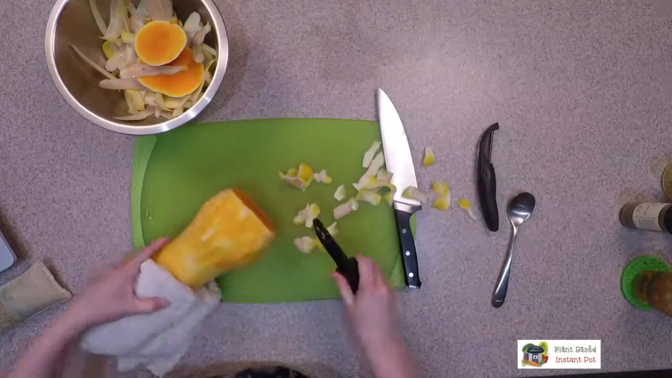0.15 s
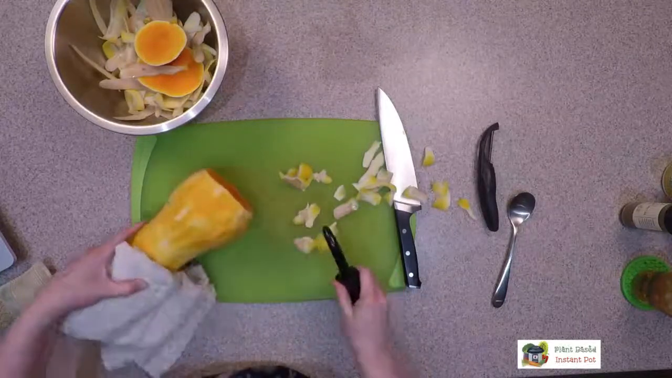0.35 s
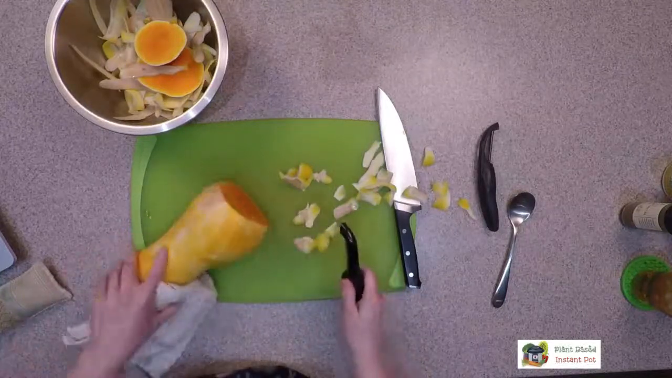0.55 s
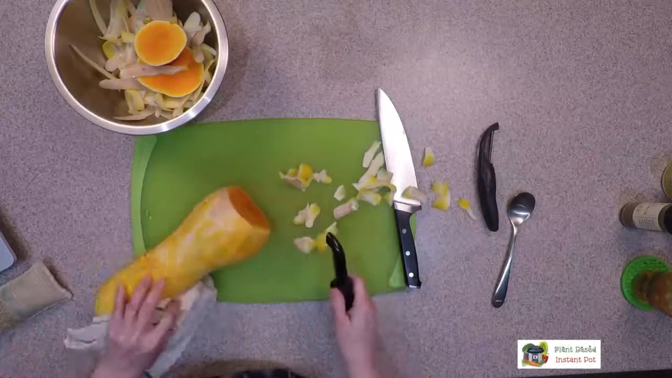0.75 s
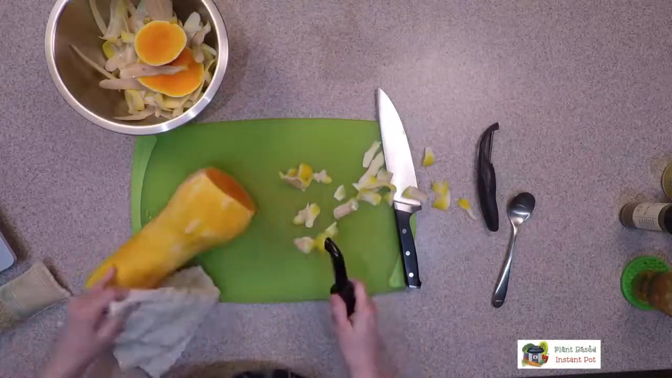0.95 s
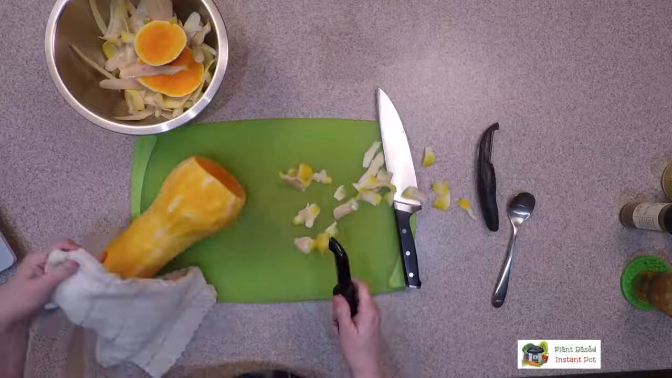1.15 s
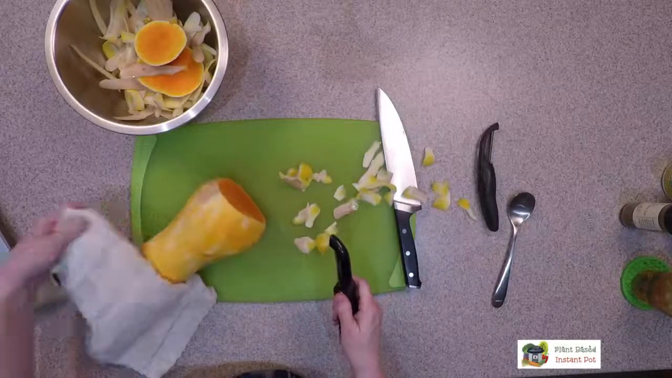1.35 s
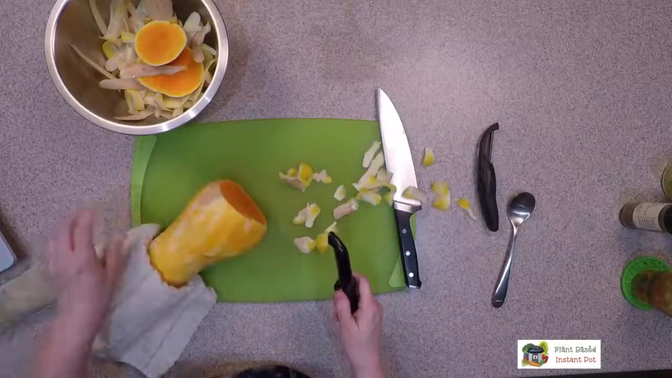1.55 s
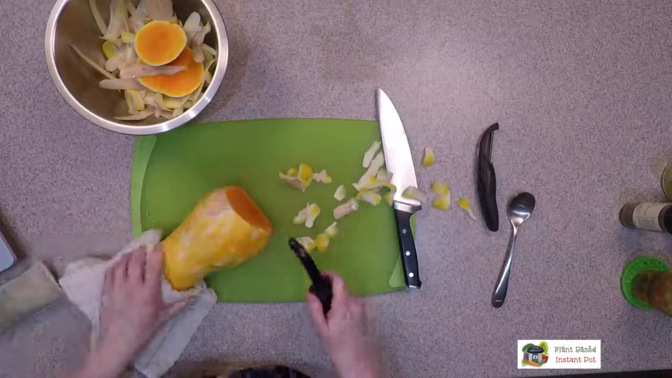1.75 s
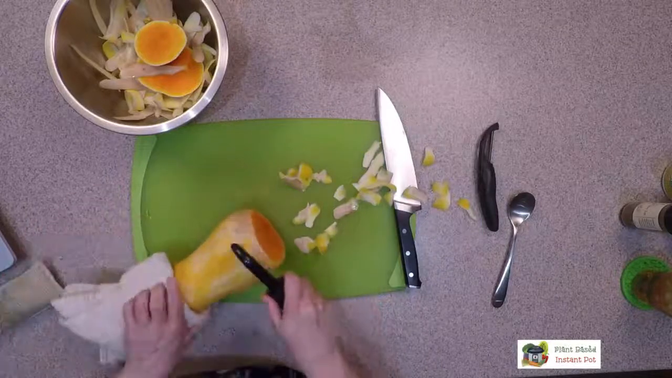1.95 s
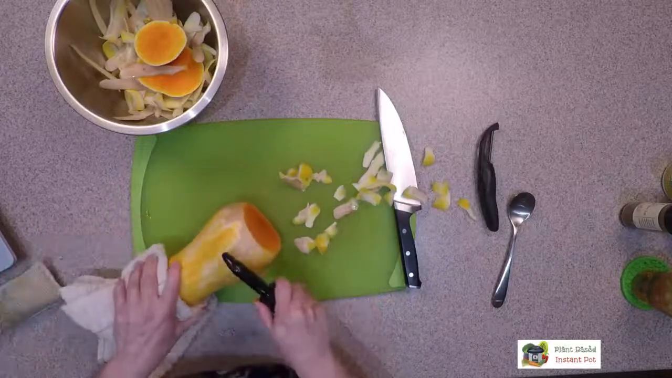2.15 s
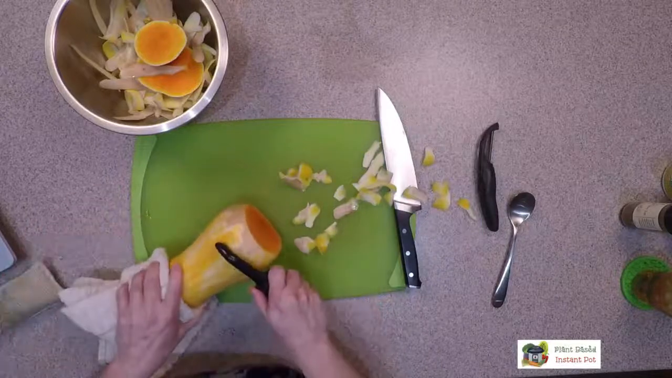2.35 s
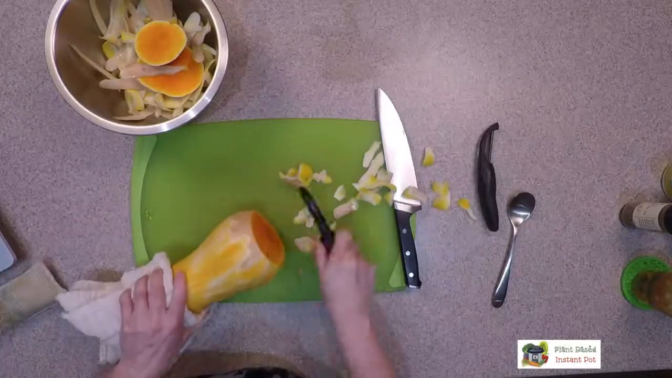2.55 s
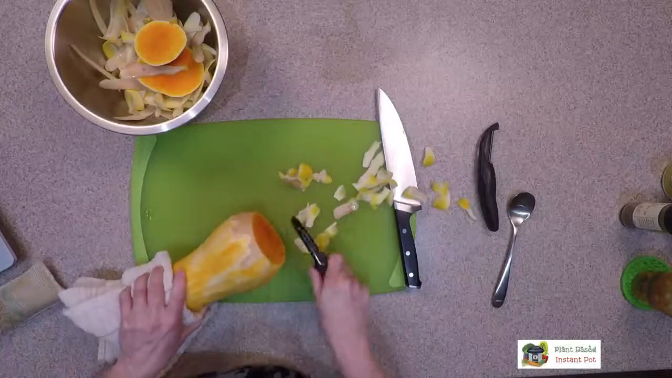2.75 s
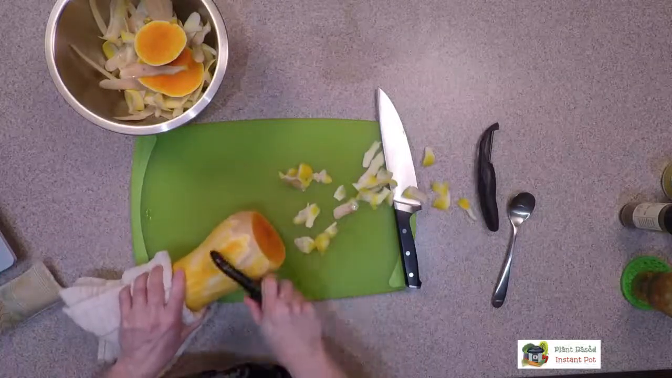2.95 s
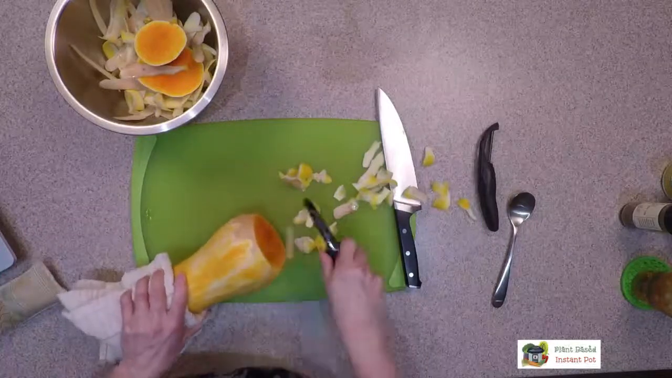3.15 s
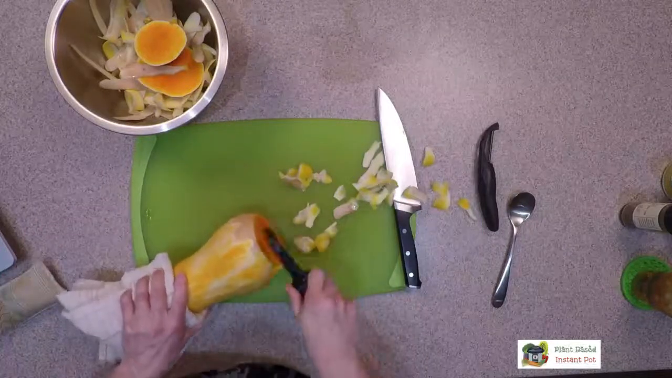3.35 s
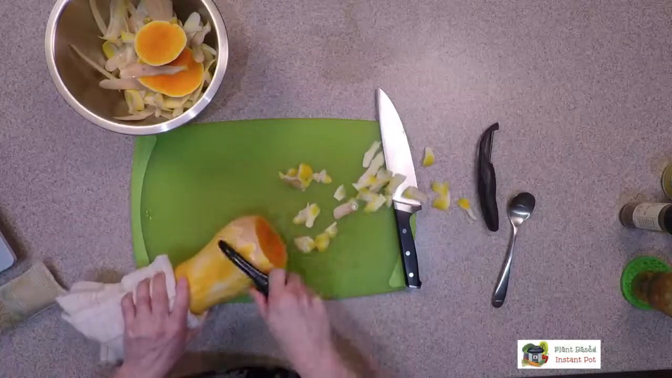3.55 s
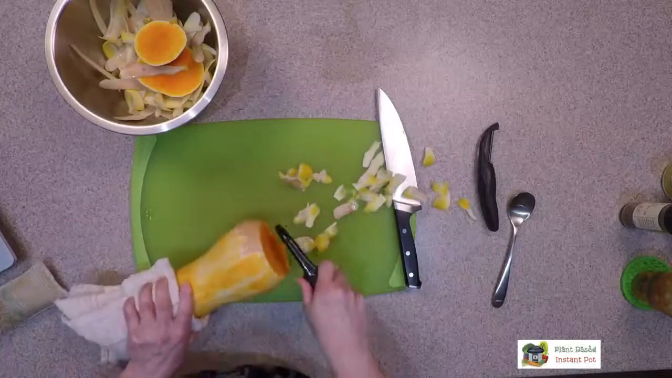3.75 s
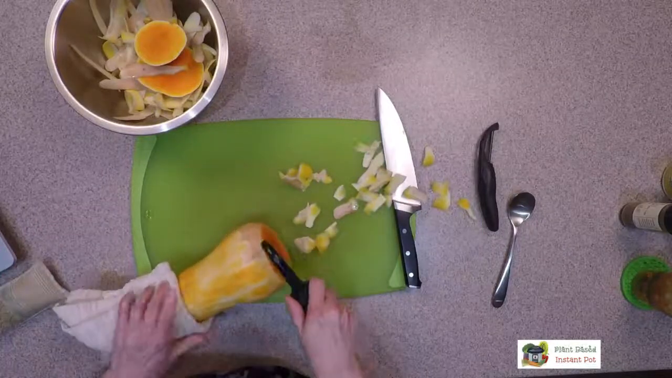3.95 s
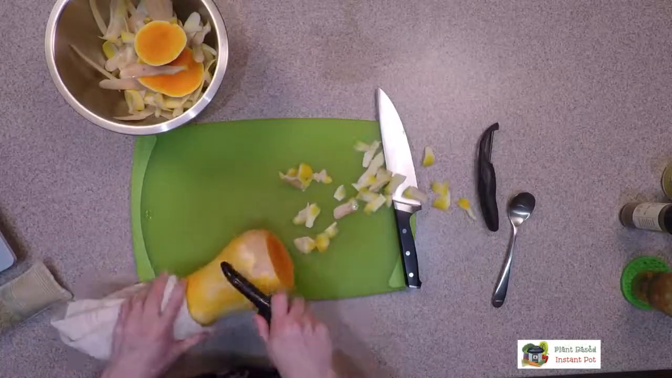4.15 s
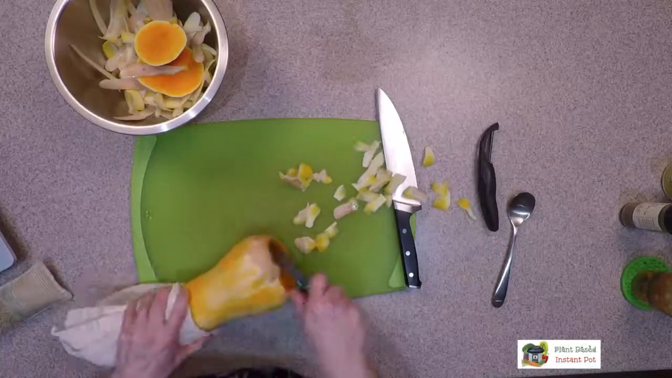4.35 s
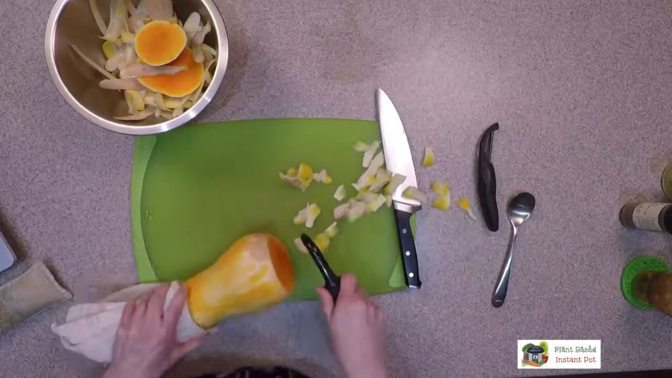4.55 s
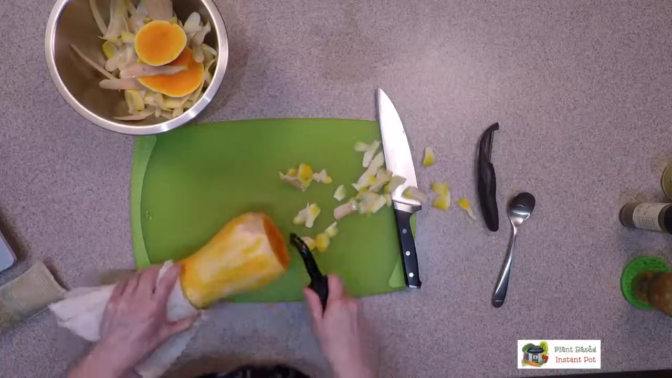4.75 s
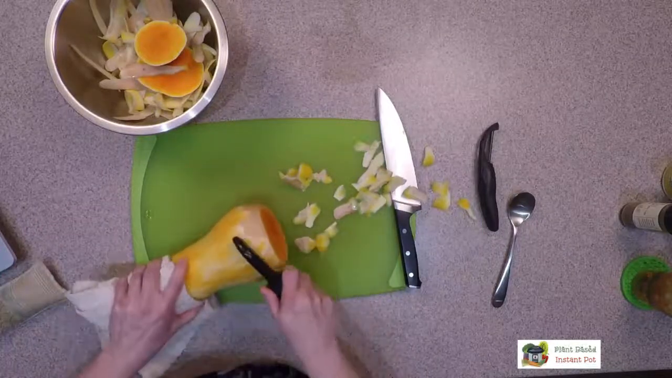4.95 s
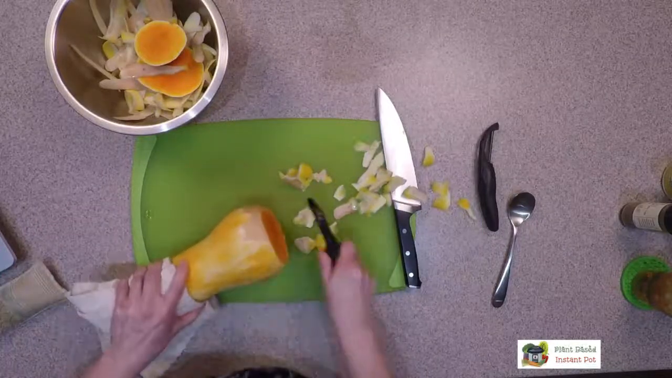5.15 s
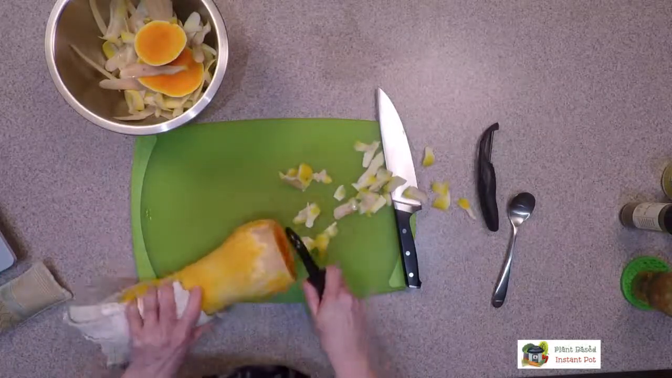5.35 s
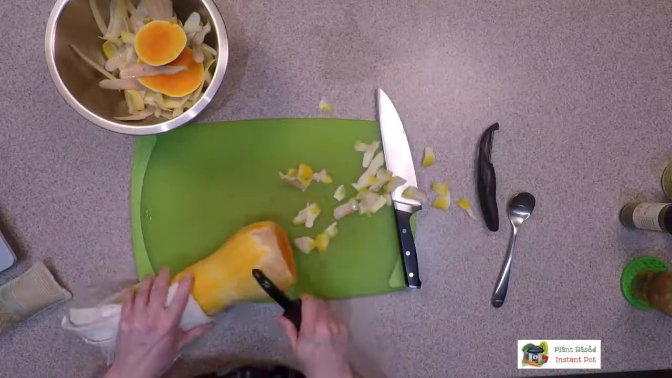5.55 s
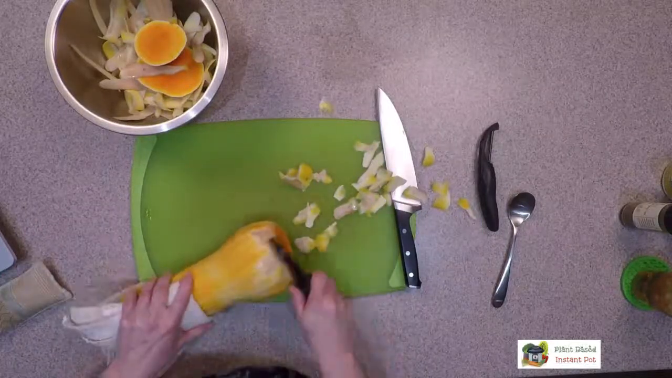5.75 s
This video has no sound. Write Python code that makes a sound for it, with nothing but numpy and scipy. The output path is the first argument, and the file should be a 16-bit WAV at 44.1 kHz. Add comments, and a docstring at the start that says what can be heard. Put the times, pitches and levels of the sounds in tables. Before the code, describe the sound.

A peeler takes short crisp scrapes off a firm squash, with light blade ticks, low board thuds and two heavy drops in a quiet kitchen.

```python
"""A kitchen hums quietly while a peeler taps and brushes a firm squash: bursts of noise ring in the blade.
The squash rocks on a thin plastic board, with low thuds in the counter; a cloth rustles against it.
Twice it drops onto the board with a hard, low swing. From 2.4 s the blade lands, drags through the skin
and slips off, seven times: tiny random snaps excite the peeler and the squash, and hollow knocks join in.
The recorder squeezes the loudest thuds and cuts off the high treble."""
import sys
import numpy as np
from scipy import signal
from scipy.fft import rfft, irfft, next_fast_len
from scipy.io import wavfile
from scipy.ndimage import uniform_filter1d, map_coordinates

SR = 44100
rng = np.random.default_rng(int(sys.argv[2]) if len(sys.argv) > 2 else 0)


def to_wav(s):
    """Save 16-bit WAV."""
    ch = np.atleast_2d(s).T  # columns
    pcm = np.round(np.clip(ch, -1, 1) * 32767)  # PCM
    wavfile.write(sys.argv[1], SR, pcm.astype(np.int16))


N = 260190  # samples in the scene
STEP = 16  # samples from one control value to the next

# How the thin board rings: pitch_hz, width_hz, level_db
BOARD_MODES = [(124, 41, -4), (185.6, 39.8, 3), (250, 85, -6), (354, 56, -8), (490, 45, -11.5),
               (574, 67, -10.5), (727, 110, -13), (900, 120, -19), (1204, 300, -25)]
# How the blade rings: pitch_hz, width_hz, level_db
BLADE_MODES = [(4100, 119, -7.5), (4794, 540, -3.5), (5210, 640, -2.5), (5810, 610, -2.5), (6155, 420, 0),
               (6380, 830, -8.5)]
# How the peeler's frame rings: pitch_hz, width_hz, level_db
FRAME_MODES = [(1880, 600, -14.5), (2300, 190, -7.5), (3020, 410, -8.5), (3270, 150, -4.5), (3830, 540, -7)]


def amp(db):
    """Turn decibels into a gain."""
    return 10 ** (np.asarray(db) / 20)


def unit(x):
    """Scale to an rms of 1."""
    return x / np.sqrt(np.mean(x ** 2) + 1e-20)


def along(points, hz):
    """Read a curve of (Hz, value) points on a log pitch axis."""
    point_hz, value = np.transpose(points)
    return np.interp(np.log(hz + 1), np.log(point_hz + 1), value)


def wobble(rate):
    """A smooth random curve with this many knots a second."""
    knots = rng.standard_normal(int(N * rate / SR) + 4)
    return map_coordinates(knots, [np.arange(N) * rate / SR])


def filtered(x, response):
    """Shape the spectrum of x by a function of frequency."""
    m = next_fast_len(len(x) + 8192)  # spare room for the ringing
    return irfft(rfft(x, m) * response(np.fft.rfftfreq(m, 1 / SR)), m)[:len(x)]


def modes(table):
    """Response of a body with several rings, added with alternating signs."""
    def response(f):
        total = 0
        for k, (hz, width_hz, db) in enumerate(table):
            total = total + (-1) ** k * amp(db) * 1j * f * width_hz / (hz * hz - f * f + 1j * f * width_hz)
        return total
    return response


def add(track, s, sound):
    """Mix a sound into a track at time s, in seconds."""
    part = track[max(round(s * SR), 0):][:len(sound)]
    part += sound[:len(part)]


def peak(s, db, rise_db_per_s, fall_db_per_s):
    """Control gain that climbs to a crest at s and falls away, at steady rates in dB."""
    t = np.arange(0, N, STEP) / SR - s
    return amp(db - np.where(t < 0, -t * rise_db_per_s, t * fall_db_per_s))


def per_sample(control):
    """Fill in a control curve so that every sample has a value."""
    return np.interp(np.arange(N), np.arange(0, N, STEP), control)


def curve(rows):
    """One value per sample from (s, value) rows."""
    return np.interp(np.arange(N) / SR, *np.transpose(rows))


def kitchen():
    """Steady air is shaped noise, an appliance hums in wavering tones, and the counter rumbles in lumps."""
    # Colour of the air noise: pitch_hz, relative_level_db
    air_colour = [(15, -46), (25, -4), (69, -18), (190, -10.5), (286, -17), (356, -19), (411, -16.5),
                  (464, -15.5), (1930, -27), (2280, -31), (3050, -28.5), (3700, -32.5), (5440, -32.5),
                  (6280, -37), (8000, -66.5), (10400, -104), (17600, -120)]
    # Hum of an appliance: pitch_hz, typical_rms_level_db, waver_hz
    hum_tones = [(60.7, -68, 4.5), (116, -59.5, 5), (358, -62, 2.33)]
    # Counter rumble under the hands: time_s, level_db
    sway_levels = [(0.0, -57.5), (0.4, -48.5), (0.64, -44.5), (1.17, -54), (2.22, -51), (3.14, -60),
                   (3.81, -55), (3.99, -48.5), (4.21, -53.5), (4.86, -52), (5.2, -45), (5.5, -51),
                   (5.9, -50.5)]
    air_db = -56
    air = unit(filtered(rng.standard_normal(N), lambda hz: amp(along(air_colour, hz))))
    t = np.arange(N) / SR
    hum = np.zeros(N)
    for hz, db, waver_hz in hum_tones:
        gain = amp(db + 2.3 * wobble(4.9)) * np.sqrt(2)
        turns = hz * t + waver_hz * np.cumsum(wobble(25)) / SR
        hum += gain * np.sin(2 * np.pi * turns)
    lumpy = amp(3 * wobble(14))
    rumble = filtered(rng.standard_normal(N) * lumpy, lambda f: modes([(65, 60, 0)])(f) ** 2)
    return amp(air_db) * air + hum + amp(curve(sway_levels)) * unit(rumble)


def ticks():
    """Each blade contact is a short burst in the blade, a push into the squash and a knock on the board."""
    # Blade contacts: start_s, blade_peak_db, brightest_hz,
    # board_knock_db and squash_ring_db (both relative to the blade's peak)
    contacts = [(0.0074, -29, 3200, -32, -30), (0.0544, -37, 3780, -29, -29),
                (0.0768, -26.5, 3620, -19, -36), (0.1567, -44, 3460, -19, -19),
                (0.1887, -33, 3500, -12, -16), (1.745, -57, 2050, 2, 5.5), (2.37, -22, 4760, -19, -20),
                (2.379, -12.5, 4800, -22.5, -9), (2.3904, -18, 4800, -20, -14),
                (2.4708, -37, 2370, -10, -25), (2.6087, -28, 5250, -18, -19), (2.6162, -19, 5990, -27, -30),
                (2.6435, -37.5, 5510, 0.5, 12), (2.6697, -22.5, 5570, -24, -22),
                (2.818, -33.5, 5240, -24, -35), (2.9976, -34.5, 5670, -18, -35),
                (3.0084, -34, 2793, -23, -39), (3.0402, -41, 5670, -6, -23),
                (3.0853, -27, 4010, -23.5, -26), (3.1033, -7.5, 6500, -7, -14),
                (3.2107, -25.5, 5640, -19, -19.5), (3.2569, -22.5, 5167, -16, -20),
                (3.2609, -24, 5730, -19.5, -20), (3.3645, -32, 4900, -19, -31),
                (3.4174, -36.5, 5760, -17, -18), (3.5247, -33.5, 5350, -22, -35),
                (3.5492, -43.5, 2020, -4, -29), (3.5995, -33.5, 5043, -20, -36),
                (3.6226, -3, 5900, -14.5, -18.5), (3.7363, -23, 2880, -19.5, -6.5),
                (3.7549, -22.5, 4090, -23, -6), (3.8673, -30.5, 5760, -33.5, -35),
                (3.911, -31, 6030, -38, -31), (3.9293, -39.5, 5730, -24, -26),
                (3.9874, -36.5, 4870, -17.5, -25), (4.343, -34, 3500, -30, -30),
                (4.349, -8.5, 6100, -17, -30), (4.369, -27.5, 6260, -18, -17), (4.49, -24, 5860, -21, -6),
                (4.5106, -12, 5580, -40, -27), (4.5302, -17, 6200, -34, -33),
                (4.5435, -24.5, 5710, -41, -30), (4.743, -47, 3300, -3, -14), (5.001, -23, 5440, 5.5, -2),
                (5.034, -26, 3900, -1, 0), (5.1094, -36.5, 5740, -9, -23), (5.254, -24.5, 5400, -19, -25),
                (5.26, -22, 5330, -25, -25), (5.4568, -60, 2039, 13.5, 19), (5.7651, -23.5, 3950, -10, 3),
                (5.7794, -25, 5330, -18, -19), (5.7904, -20.5, 5530, -12, -18)]
    # How the squash rings: pitch_hz, width_hz, level_db
    squash_modes = [(975, 180, -6.5), (1249, 226, -3), (1363, 293, -7)]
    hard_t60_s, softer_s_per_db = .015, .00055  # a light contact rattles on longer than a hard one
    own_width, own_db, own_db_per_db = .055, -0.5, .2  # width is a share of the pitch
    frame_over_blade_db = 3
    out, t = np.zeros(N), np.arange(SR // 8) / SR
    click = signal.unit_impulse(len(t))
    frame = [(hz, width_hz, db + frame_over_blade_db) for hz, width_hz, db in FRAME_MODES]
    peeler = filtered(click, modes(BLADE_MODES + frame))
    board = filtered(click, modes(BOARD_MODES))
    squash = filtered(click, modes(squash_modes))

    def through(x, body):
        """Let a body ring in answer to a push."""
        return signal.fftconvolve(x, body)[:len(t)]

    for s, db, hz, knock_db, ring_db in contacts:
        t60 = np.clip(hard_t60_s - softer_s_per_db * db, .005, 1)
        burst = (1 - np.exp(-t / 0.00016)) * amp(-60 * t / t60) * rng.standard_normal(len(t))
        # each contact favours one ring, light contacts the more
        own_ring = filtered(click, modes([(hz, own_width * hz, own_db - own_db_per_db * db)]))
        bright = through(burst, peeler + own_ring)
        push = rng.standard_normal((2, len(t))) * np.exp(-t / 0.0013)
        knock = through(t * np.exp(-t / 0.00024) * (1 + 0.35 * push[0]), board)
        ring = through(push[1], squash)
        body = amp(knock_db) * knock / np.abs(knock).max() + amp(ring_db) * ring / np.abs(ring).max()
        add(out, s, amp(db) * (bright / np.abs(bright).max() + body))
    return out


def walls(x):
    """Room echo: a noise tail in which each frequency dies at its own speed."""
    # Echo decay: pitch_hz, time_to_fall_60_db_s
    echo_decay = [(200, 0.22), (2000, 0.41), (7000, 0.19)]
    hz, t, z = signal.stft(rng.standard_normal(SR // 2), SR, nperseg=256)
    fading = amp(-60 * t / along(echo_decay, hz)[:, None])
    tail = signal.istft(z * fading, SR, nperseg=256)[1]
    delayed = np.pad(x, (200, 0))
    return signal.fftconvolve(delayed, tail / np.linalg.norm(tail))[:N]


def scuffs(controls):
    """The blade brushes the skin between strokes: quick swells of hiss, frame ring and squeak."""
    # Brushes: crest_s, hiss_db, frame_over_blade_db, squeak_hz, squeak_db, fade_db_per_s
    brushes = [(0.014, -40, -6, 3200, -50, 897), (0.08, -37.5, -3.5, 3706, -48, 902),
               (0.19, -62, 5, 3300, -70, 250), (3.002, -47, -1, 2830, -39.5, 747),
               (3.088, -42, -2, 4020, -46, 901), (3.526, -48, -9.5, 2051, -56, 651),
               (3.54, -71, -1, 2050, -53, 350), (3.602, -41.5, -4, 4940, -56, 598.5),
               (3.914, -43.5, -20, 5690, -54.5, 649.5), (5.036, -52, 11, 1700, -46, 500),
               (5.11, -62, -10, 5750, -56.5, 499)]
    rise_db_per_s = 3000.5
    blade, frame, _, squeak, _, squeak_hz = controls  # each row is changed in place
    for s, db, frame_db, hz, squeak_db, fade in brushes:
        brush = peak(s, 0, rise_db_per_s, fade)
        squeak_hz[brush * amp(squeak_db) > squeak] = hz  # a brush louder than the squeak so far sets the pitch
        blade += brush * amp(db)
        frame += brush * amp(db + frame_db)
        squeak += brush * amp(squeak_db)


def rattle():
    """Dull noise in the board's modes."""
    noise = rng.standard_normal(N)
    return unit(filtered(noise, lambda f: modes(BOARD_MODES)(f) / (1 + 1j * f / 600) ** 2))


def thuds():
    """Each thud is a few low cycles in the counter; the loose board rattles along."""
    # Thuds: crest_s, peak_db, pitch_hz, fall_s, board_rattle_db (relative to the thud)
    thud_rows = [(0.2, -43, 68, .008, -13), (0.551, -18.5, 84, .005, -23), (0.576, -23, 78, 0.0063, -18.5),
                 (0.68, -13.5, 62, .012, -14.5), (0.721, -21, 63, 0.0055, -22.5),
                 (0.752, -24.5, 68, 0.014, -18.5), (1.002, -35, 75, .006, -23), (1.028, -30, 66, .006, -19),
                 (1.093, -34.5, 69, 0.011, -18), (1.139, -28.5, 71, 0.0026, -26),
                 (1.183, -27.5, 67, 0.0049, -26), (1.209, -37, 52, .012, -18),
                 (1.335, -37, 82, 0.0083, -12), (1.366, -24, 63, .009, -31),
                 (1.414, -25, 81, 0.0064, -20.5), (1.437, -36, 81, .009, -24), (1.495, -34, 59, 0.019, -18),
                 (1.627, -32.5, 56, .007, -31), (1.653, -27.5, 55, .012, -33),
                 (1.779, -29.5, 70, 0.009, -21), (1.806, -19.5, 65, 0.011, -29),
                 (1.851, -27, 48.5, .012, -34), (1.887, -38, 48, .016, -20), (2.046, -42.5, 72, .029, -22),
                 (2.65, -36.5, 79, .008, -3), (2.689, -31, 49, 0.0056, -8), (3.115, -20.5, 68.6, 0.023, -9),
                 (3.273, -30, 74.6, .022, -23.5), (3.312, -35, 62, .018, -31), (3.635, -16, 70.5, .021, -8),
                 (3.725, -39.5, 66.5, .021, -13), (3.767, -29, 60, .005, -10), (3.83, -24, 66, .01, -28.5),
                 (3.856, -19, 66.8, 0.0093, -27), (4.221, -33.5, 49, .012, -19.5),
                 (4.262, -39, 45, .02, -28), (4.367, -25, 66.8, .012, -8.5), (4.559, -40.5, 45, .015, -28),
                 (4.97, -37.5, 57, 0.0061, -10), (5.055, -12.5, 63, .008, -14),
                 (5.088, -16, 66, 0.0095, -23.5), (5.118, -15, 68.6, 0.0089, -20.5),
                 (5.138, -22, 75, .009, -11), (5.161, -30, 81, 0.015, -16), (5.285, -41.5, 66, 0.011, -11),
                 (5.442, -22.5, 66.8, .008, -27), (5.463, -25.5, 62, .008, -28),
                 (5.773, -38, 90, 0.0053, 3.5)]
    rise_s, rattle_lingers = 0.0062, 1.88  # the rattle's decay time is this many times the thud's fall
    low, shake = np.zeros(N), np.zeros(N)
    t = np.arange(-SR // 10, SR // 5) / SR
    for s, db, hz, fall, rattle_db in thud_rows:
        swell = np.exp(-.5 * (t / np.where(t < 0, rise_s, fall)) ** 2)
        cycles = np.cos(2 * np.pi * hz * t + rng.uniform(0, 2 * np.pi))
        add(low, s + t[0], amp(db) * swell * cycles)
        shaking = np.where(t < 0, swell, np.exp(-t / (rattle_lingers * fall)))
        add(shake, s + t[0], amp(db + rattle_db) * shaking)
    return low + shake * rattle()


def towel():
    """A cloth is shifted around the squash and rubs it: uneven noise through broad and narrow rings."""
    # Cloth moves: crest_s, rustle_db, rubbed_squash_ring_db, fade_either_side_db_per_s
    cloth_moves = [(0.27, -66, -59, 58), (0.55, -63, -54, 150.5), (0.69, -85.5, -69.5, 63),
                   (0.81, -65.5, -72, 142), (1.1, -81, -74, 21), (1.46, -78, -69, 103),
                   (1.62, -71.5, -79, 100), (1.76, -66, -69, 154), (2.07, -61, -84, 253),
                   (2.35, -79, -65, 400.5), (4.87, -75, -55, 198), (4.91, -67.5, -53.5, 200),
                   (4.945, -65.5, -45.5, 400)]
    rustle = sum(peak(s, db, fade, fade) for s, db, _, fade in cloth_moves)
    rub = sum(peak(s, db, fade, fade) for s, _, db, fade in cloth_moves)
    cloth_noise = rng.standard_normal(N) * amp(2.2 * wobble(30))
    cloth = filtered(cloth_noise, modes([(4800, 2800, 0)]))
    rub_noise = rng.standard_normal(N) * amp(3.9 * wobble(60))
    ring = filtered(rub_noise, modes([(1024, 140, 0), (1400, 300, -4.5), (2000, 1400, -12.5)]))
    return per_sample(rustle) * unit(cloth) + per_sample(rub) * unit(ring)


def drops():
    """The squash drops: the counter swings hard for a few peaked cycles, first away from the microphone."""
    # Drops onto the board: start_s, swing_db, pitch_hz, length_s,
    # third_harmonic_db and board_rattle_db (both relative to the swing)
    drop_rows = [(0.6147, -2.5, 68.65, 0.037, -10.5, -16), (4.9935, -3.5, 66.2, 0.038, -11.5, -15)]
    low, shake, t = np.zeros(N), np.zeros(N), np.arange(SR // 5) / SR
    for s, db, hz, length, third_harmonic_db, rattle_db in drop_rows:
        swell = np.clip(t / 0.011, 0, 1) ** 2 * np.exp(-(t / length) ** 4)
        turn = 2 * np.pi * hz * t
        swing = np.sin(turn) + amp(third_harmonic_db) * np.sin(3 * turn + 3.9)
        add(low, s, -amp(db) * swell * swing)
        add(shake, s, amp(db + rattle_db) * (t / 0.02) ** 2 * np.exp(-t / 0.019))
    return low + shake * rattle()


def strokes(controls):
    """Each stroke bites, drags at a steady level, swells as the skin tears, then slips off and fades."""
    # Strokes: bite_s, bite_db, bite_ring_db, drag_db, frame_over_blade_db, drag_ring_db, slip_s,
    # tear_db, fade_db_per_s, tear_ring_db, bite_squeak_hz, slip_squeak_hz, squeak_db
    stroke_rows = [(2.372, -32, -33.5, -50, -2.5, -53, 2.52, -54, 290, -63, 2500, 2300, -53),
                   (2.61, -39, -44, -45.5, 1, -59, 2.66, -46.5, 276, -29.5, 3200, 3250, -50.5),
                   (3.105, -35, -38.5, -52, 2.5, -56, 3.258, -40.5, 300.5, -36.5, 2900, 3350, -50),
                   (3.621, -31, -37, -48.5, -3, -63, 3.767, -38, 270, -35, 4120, 3900, -47),
                   (4.348, -31, -43, -50.5, -1.5, -60, 4.515, -37.5, 159, -35, 3750, 3400, -52.5),
                   (5.15, -75, -76, -71, 5, -43, 5.26, -42, 331.5, -46, 3200, 3450, -49),
                   (5.766, -35, -38, -48, -0.5, -49, 5.893, -48, 30, -45, 3850, 3070, -53)]
    set_in_s, bite_db_per_s, tear_db_per_s = .003, 500, 140  # the bite dies, the tearing swells
    frame_drag_db, frame_tear_db, frame_bite_db = 3, -5.5, -8  # the frame favours the drag
    frame_fades = 1.3  # times the blade's fade
    bite_ring_db_per_s, drag_ring_db_per_s = 600, 69.5  # falls after the bite, grows under the drag
    ring_lead_s, ring_db_per_s = .02, 600.5  # the tear's ring is loudest just before the slip
    ring_top_hz, ring_climb_hz, glide_s = 1207, 70, .08  # the ring climbs to its pitch as the slip nears
    t = np.arange(0, N, STEP) / SR
    blade, frame, ring, squeak, ring_hz, squeak_hz = controls  # each row is changed in place
    for (bite_s, bite_db, bite_ring_db, drag_db, frame_db, drag_ring_db,
         slip_s, tear_db, fade, tear_ring_db, from_hz, to_hz, squeak_db) in stroke_rows:
        on = np.clip((t - bite_s) / set_in_s, 0, 1)
        frame_fade = frame_fades * fade
        bite = peak(bite_s, bite_db, 0, bite_db_per_s)
        drag = peak(slip_s, drag_db, 0, fade)
        tear = peak(slip_s, tear_db, tear_db_per_s, fade)
        blade += on * (bite + drag + tear)

        frame_drag = peak(slip_s, drag_db + frame_drag_db, 0, frame_fade)
        frame_tear = peak(slip_s, tear_db + frame_tear_db, tear_db_per_s, frame_fade)
        frame += on * amp(frame_db) * (amp(frame_bite_db) * bite + frame_drag + frame_tear)

        bite_ring = peak(bite_s, bite_ring_db, 0, bite_ring_db_per_s)
        drag_ring = peak(slip_s, drag_ring_db, drag_ring_db_per_s, 2 * fade)
        tear_ring = peak(slip_s - ring_lead_s, tear_ring_db, ring_db_per_s, ring_db_per_s)
        ring += on * (bite_ring + drag_ring + tear_ring)
        squeak += on * peak(slip_s, squeak_db, 0, frame_fade)

        begun = on > 0
        below = np.clip((slip_s - t[begun]) / glide_s - .5, 0, 1)
        ring_hz[begun] = ring_top_hz - ring_climb_hz * below
        squeak_hz[begun] = np.interp(t[begun], [bite_s, slip_s], [from_hz, to_hz])


def gliding(excite, hz, width_hz):
    """A narrow resonance whose centre moves: two slow noises steer a turning tone."""
    slow = [filtered(x, lambda f: 1 / (1 + 1j * f / width_hz) ** 2) for x in excite]
    turn = 2 * np.pi * np.cumsum(hz) / SR
    return unit(slow[0] * np.cos(turn) + slow[1] * np.sin(turn))


def patchy(x, patchy_db):
    """Random gain patches: the wet skin tears unevenly over the bands."""
    z = signal.stft(x, nperseg=256)[2]
    field = uniform_filter1d(rng.standard_normal(z.shape), size=2, axis=0)  # over pitch
    field = uniform_filter1d(field, size=12, axis=1)  # over time
    return unit(signal.istft(z * amp(patchy_db * unit(field)), nperseg=256)[1][:N])


def peeling():
    """Skin fibres tear in clumps of tiny snaps, which excite blade, frame and squash."""
    controls = np.zeros((6, len(range(0, N, STEP))))
    strokes(controls)
    scuffs(controls)
    blade_gain, frame_gain, ring_gain, squeak_gain, ring_hz, squeak_hz = map(per_sample, controls)
    clumps = amp(1.3 * wobble(170) + 1.5 * wobble(45))  # stick and slip

    def snaps():
        """Clumped noise with a few much stronger samples."""
        strength_db = 3.7 * np.minimum(rng.exponential(size=N), 6)
        return clumps * rng.standard_normal(N) * amp(strength_db)

    blade = patchy(filtered(snaps(), modes(BLADE_MODES)), patchy_db=2.5)
    frame = patchy(filtered(snaps(), modes(FRAME_MODES)), patchy_db=4.0)
    # the curling peel shifts these rings
    squeak = gliding(clumps * rng.standard_normal((2, N)), squeak_hz, width_hz=110)
    rasp_hz = 5400 + 300 * wobble(1 / .08)  # a new random knot every 0.08 s
    rasp = gliding([snaps(), snaps()], rasp_hz, width_hz=220)
    body = gliding(clumps * rng.standard_normal((2, N)), ring_hz, width_hz=180)
    peeler = blade_gain * (1.17 * blade + .5 * rasp) + frame_gain * frame
    return peeler + squeak_gain * squeak + ring_gain * body


def knocks():
    """The squash knocks hollow where it meets the board: a short wavering tone each time."""
    # Knocks: start_s, level_db, pitch_hz, time_to_fall_60_db_s
    knock_rows = [(2.38, -38, 736, .05), (2.645, -31.5, 760, 0.037), (3.105, -23, 506, .09),
                  (3.11, -27, 270, .12), (3.624, -22, 560, .12), (4.358, -32, 738, .07),
                  (4.497, -38, 690, 0.032), (5.034, -17.5, 552, 0.038), (5.04, -30, 803, 0.082),
                  (5.058, -29, 368, 0.11), (5.456, -41, 1014, .05), (5.79, -39.5, 700, 0.07)]
    out, t = np.zeros(N), np.arange(SR // 8) / SR
    for s, db, hz, t60 in knock_rows:
        drift = np.cumsum(uniform_filter1d(rng.standard_normal(len(t)), size=100)) * .03
        fading = amp(db - 60 * t / t60) * (1 - np.exp(-t / 0.0011))
        add(out, s, fading * np.sin(2 * np.pi * hz * t + drift))
    return out


def scene():
    """Mix the kitchen, peeler, squash and cloth; only contacts and knocks get a room echo."""
    contacts = ticks() + knocks()
    peeler = contacts + peeling() + amp(-10) * walls(contacts)
    return (peeler + thuds() + drops() + towel() + kitchen())[None]


def record(dry):
    """Soft overload, then the microphone's falling treble and the band limit."""
    # Microphone response: pitch_hz, level_db
    mic_response = [(20, 1), (60, -1), (6300, -3.5), (7000, -4.5), (7400, -11), (7800, -24), (8500, -45.5)]
    ceiling, cutoff_hz = .66, 8860
    soft = dry[0] / (1 + np.abs(dry[0] / ceiling) ** 4) ** (1 / 4)
    return filtered(soft, lambda hz: amp(along(mic_response, hz)) * (hz < cutoff_hz))[None]


dry = scene()
out = record(dry)
to_wav(out)
```